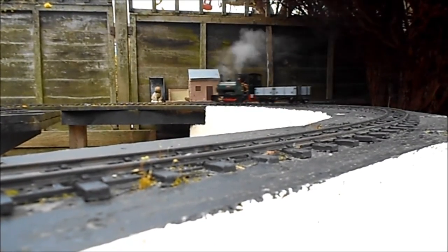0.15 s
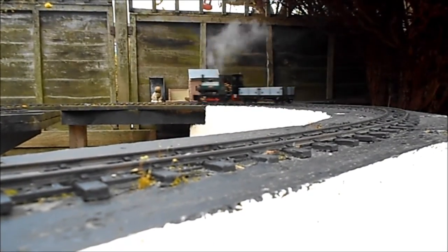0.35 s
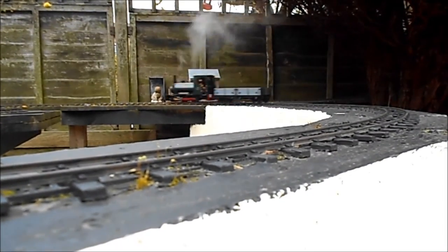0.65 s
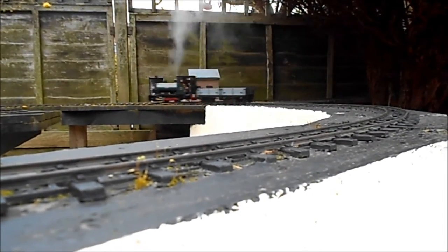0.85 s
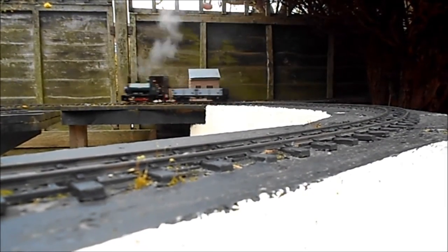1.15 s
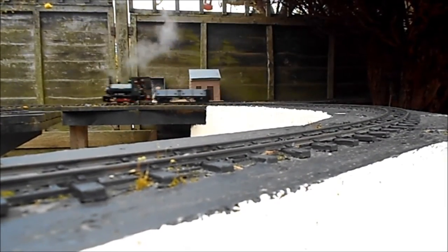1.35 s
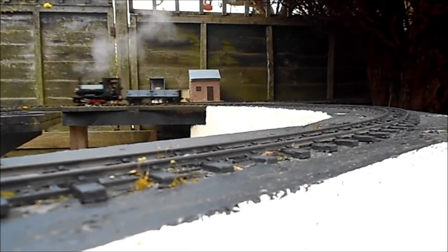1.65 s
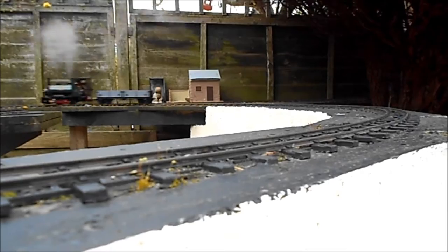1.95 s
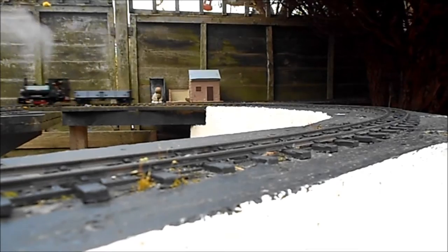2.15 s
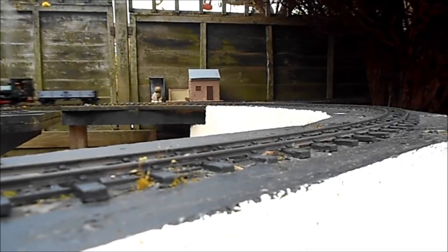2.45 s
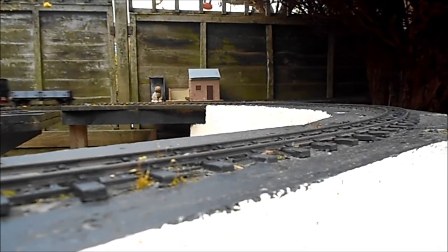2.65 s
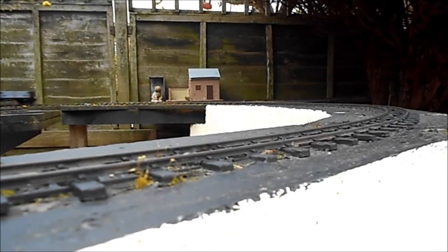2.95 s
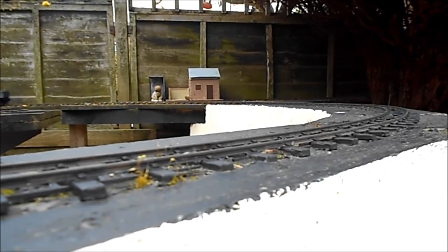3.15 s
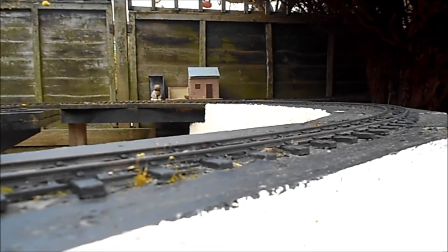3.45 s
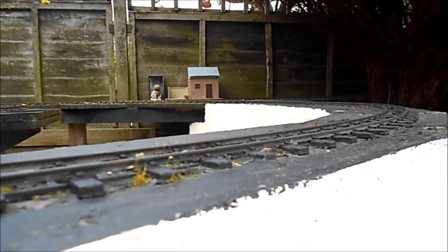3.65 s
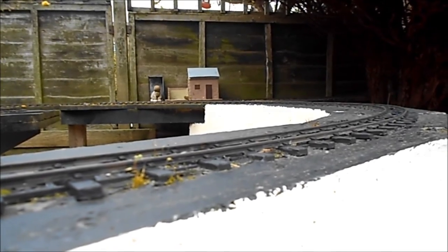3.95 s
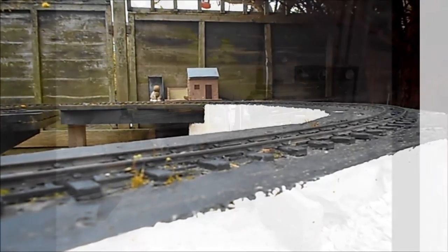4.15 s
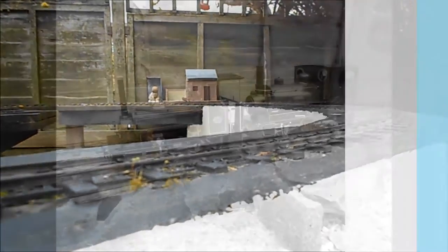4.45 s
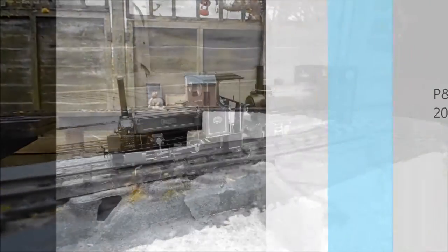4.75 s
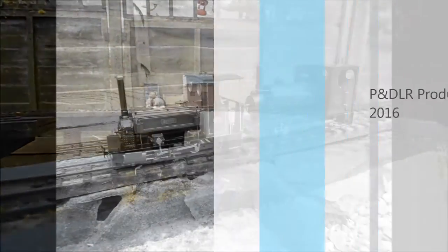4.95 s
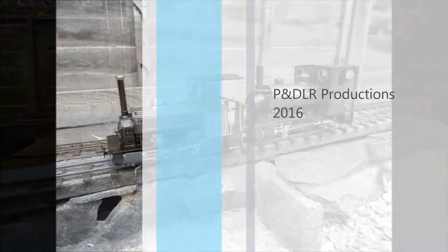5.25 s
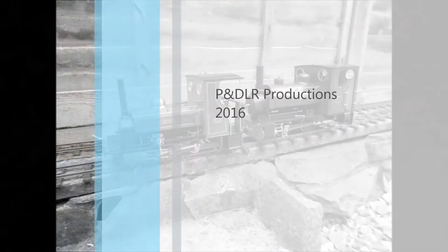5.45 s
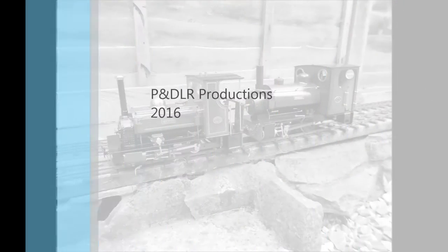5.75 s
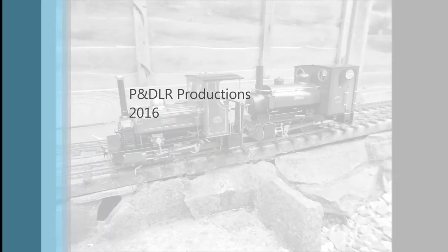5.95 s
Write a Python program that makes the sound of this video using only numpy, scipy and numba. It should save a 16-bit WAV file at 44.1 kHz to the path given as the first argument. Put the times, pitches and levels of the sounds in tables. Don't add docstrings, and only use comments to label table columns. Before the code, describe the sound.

A small steam locomotive and wagon circle a raised garden track. Broad airy hiss with a thin leaking jet runs throughout, over deck rumble and a wavering rail hum. Sharp ticks, rod chinks, coupling clinks and faint flange squeals come irregularly. Low wind thumps and fluttering bursts overload the close, unshielded microphone and briefly push the train down. Rolling grows fuller towards an abrupt cut to silence.

```python
import sys
import numpy as np
from scipy import signal
from scipy.fft import rfft, irfft
from scipy.io import wavfile
from scipy.ndimage import uniform_filter1d
from numba import njit

SR = 44100
rng = np.random.default_rng(int(sys.argv[2]) if len(sys.argv) > 2 else 0)


def ratio_of_db(decibels):
    return 10 ** (np.asarray(decibels, float) / 20)


def wav_record(signal):
    frames = np.transpose(np.atleast_2d(signal))
    bounded = np.clip(frames, -1, 1)
    quanta = np.round(bounded * 32767).astype(np.int16)
    wavfile.write(sys.argv[1], SR, quanta)


N = 269449
T = np.arange(N) / SR


def unit_rms(x):
    return x / np.sqrt(np.mean(x ** 2))


@njit
def svf(x, hz, width):
    y, b, l = np.empty(len(x)), 0., 0.
    for i in range(len(x)):
        g, k = np.tan(np.pi * hz[i] / SR), width / hz[i]
        v = (b + g * (x[i] - l)) / (1 + g * (g + k))
        b, l, y[i] = 2 * v - b, l + 2 * g * v, k * v
    return y


def walk(rate):
    k = int(SR / rate)
    held = np.repeat(rng.standard_normal(N // k + 1), k)
    x = uniform_filter1d(uniform_filter1d(held, k), k)[:N]
    return x / x.std()


def resonance(hz, width, drift, x):
    hz = hz * (1 + drift * walk(5.4))
    once = svf(x, hz, 1. * width)
    return unit_rms(svf(once, hz, 1. * width))


def patchy(spectrum, step, patchy_db, rate):
    hz, db = np.transpose(spectrum)
    octave = np.log2(np.maximum(np.fft.rfftfreq(N, 1 / SR), 1))
    whole = rfft(rng.standard_normal(N)) * ratio_of_db(np.interp(octave, np.log2(hz), db, -120, db[-1]))
    out = 0
    for centre in np.arange(np.log2(hz[0]), np.log2(hz[-1]) + .25, step):
        band = irfft(whole * np.clip(1 - abs(octave - centre) / step, 0, 1), N)
        out = out + ratio_of_db(patchy_db * walk(rate)) * band
    return unit_rms(out)


def add(out, s, grain):
    i = int(s * SR)
    out[i:i + len(grain)] += grain[:N - i]


def steam(steam_db, near):
    # (frequency [Hz], density [dB per Hz])
    hiss_spectrum = [(1200, -32.5), (1900, -6), (2120, -10), (2720, -3), (3050, -3.5), (3600, -4),
                     (4500, -1), (5200, -2), (6000, -5), (7200, -5.5), (8300, -5.5), (10300, -4)]
    hiss = ratio_of_db(0.6 * walk(40) + 3) * patchy(hiss_spectrum, 0.06, 1.4, 22)
    jet_db = -4 - 8 * near
    jet_level = ratio_of_db(jet_db - 1.5 + 1.7 * walk(16))
    jet = jet_level * resonance(9210, 2500, 0.011, rng.standard_normal(N))
    return ratio_of_db(steam_db) * (hiss + jet)


def rolling(steam_db, hum_re_steam_db, near):
    # (frequency [Hz], density [dB per Hz])
    deck_spectrum = [(59, -27.5), (100, -3.0), (188, -4.0), (304, -1.5), (346, -3), (573, -2.0),
                     (723, -5.5), (1040, -3.5), (1280, -11.5), (1860, -17.0), (2200, -27.5), (2860, -50),
                     (4840, -120)][:-2]
    # (frequency [Hz], width [Hz], level re hum [dB])
    deck_modes = [(425.7, 61, -4.5), (575, 83, -7.5)]
    deck_db = steam_db + 2.5 + 8 * near
    roar_db = steam_db - 5 + 8.5 * near + 0.21 * hum_re_steam_db
    tread = rng.standard_normal((3, N)) * ratio_of_db(0.97 * walk(90))

    deck = ratio_of_db(deck_db + 3) * patchy(deck_spectrum, .3, 1.1, 30)
    hum_hz = 1153 - 20.8 * T
    hum = resonance(hum_hz, 166, 0.033, tread[0])
    for hz, width, db in deck_modes:
        hum += ratio_of_db(db) * resonance(hz, width, 0.024, tread[0])
    hum += ratio_of_db(-15.5 + 2.4 * walk(3)) * resonance(1464, 260, 0.067, tread[2])
    roar = ratio_of_db(roar_db - 5.0) * resonance(1620, 1400, 0.04, tread[1])
    grind = ratio_of_db(deck_db - 12.0) * resonance(2970, 2400, .03, tread[2])

    span_s, span_width_s = 5.23, .09
    span_db = -27 - 6.5 * ((T - span_s) / span_width_s) ** 2
    drum = ratio_of_db(span_db) * resonance(540, 260, 0.083, tread[1])
    return drum + deck + ratio_of_db(steam_db + hum_re_steam_db - 6.0) * hum + roar + grind


def rubbed_modes(events, share, fits_db):
    out = 0
    for start, end, hz, db in events:
        rub = np.clip(np.minimum(T - start, end - T) / .02, 0, 1)
        mode = resonance(hz, share * hz, .006, rng.standard_normal(N))
        mode_rms = np.sqrt(np.average(mode ** 2, weights=rub))
        out = out + rub * ratio_of_db(db + fits_db * walk(40)) * mode / mode_rms
    return out


def flange_squeals():
    # (start [s], end [s], frequency [Hz], level [dB])
    squeal_events = [(1.03, 1.1, 9300, -43), (1.18, 1.25, 4930, -40), (1.23, 1.42, 5120, -41),
                     (1.42, 1.5, 9100, -40), (1.42, 1.5, 3200, -41), (1.51, 1.6, 3150, -46),
                     (1.43, 1.5, 5300, -40), (1.07, 1.12, 3790, -45), (.35, .41, 5210, -56),
                     (1.7, 1.75, 8420, -47), (2.0, 2.15, 3200, -43), (2.62, 2.72, 9670, -45),
                     (1.33, 1.39, 1510, -41), (1.01, 1.07, 1960, -44), (3.78, 3.85, 1765, -46),
                     (1.74, 1.92, 9250, -44), (1.79, 1.93, 3200, -43), (2.62, 2.87, 10150, -42),
                     (3.9, 4.1, 1790, -48), (4.1, 4.4, 1790, -44), (4.05, 4.5, 9950, -43),
                     (4.13, 4.28, 3000, -41), (4.21, 4.31, 3190, -40), (4.66, 4.77, 3100, -42)]
    return rubbed_modes(squeal_events, .04, 2.5)


def board_booms():
    # (start [s], end [s], frequency [Hz], level [dB])
    boom_events = [(.82, .9, 450, -36), (1.72, 1.79, 430, -36), (1.89, 1.97, 430, -34),
                   (3.97, 4.05, 925, -34), (4.15, 4.24, 905, -33), (4.62, 4.7, 1080, -33),
                   (4.83, 4.9, 300, -26), (4.92, 4.97, 330, -30), (4.95, 5.01, 620, -29),
                   (5.02, 5.09, 1000, -30), (5.09, 5.17, 950, -32), (5.15, 5.21, 420, -27),
                   (5.2, 5.28, 600, -27), (5.25, 5.31, 490, -28), (5.33, 5.41, 580, -31),
                   (5.42, 5.48, 900, -31)]
    return rubbed_modes(boom_events, 0.1, 1.5)


def taps(events, t60, width, tick):
    out, t = np.zeros(N), np.arange(SR // 8) / SR
    fade = np.exp(-np.log(1000) * t / t60)
    blow = 6 * (np.arange(len(t)) == SR // 1000)
    for s, db, hz in events:
        grit = rng.standard_normal((2, len(t))) * fade + blow
        centre = np.full(len(t), 1. * hz)
        ring = svf(svf(grit[0], centre, 1. * width), centre, 2. * width)
        ring += tick * svf(grit[1] * fade, np.full(len(t), 7000.), 8800.0)
        ring = ratio_of_db(db) * ring / abs(ring).max()
        add(out, s, ring)
        add(out, s + 0.0027, ratio_of_db(-6.5) * ring)
        add(out, s + 0.01, ratio_of_db(-10.0) * ring)
    return out


def bright_ticks():
    # (time [s], peak [dB], frequency [Hz])
    tick_events = [(.0697, -20, 5040), (.196, -34, 4910), (.3172, -31.5, 5130), (.4434, -22.5, 4750),
                   (.5117, -22, 5090), (.5716, -18.5, 7000), (.6973, -19, 5000), (.828, -14.5, 5400),
                   (.9617, -13, 4570), (1.026, -21.5, 4520), (1.2994, -16, 4600), (1.705, -22, 8430),
                   (1.799, -20, 6240), (1.8208, -17, 5140), (1.833, -18.5, 4610), (1.9629, -34.5, 4780),
                   (2.1027, -7.5, 7900), (2.1808, -12.5, 7460), (2.464, -11.5, 7500),
                   (2.5337, -10.5, 7050), (2.5457, -12, 4740), (2.6818, -17, 8490), (2.734, -16, 4730),
                   (3.0614, -37, 4500), (3.1994, -27, 8600), (4.2383, -13.5, 5070)]
    return taps(tick_events, 0.05, 2000, 1.0)


def rod_chinks():
    # (time [s], peak [dB], frequency [Hz])
    chink_events = [(.7642, -32, 9350), (1.0256, -26, 9600), (1.0645, -22, 9700), (1.4142, -26, 8820),
                    (1.5304, -25, 9200), (1.7394, -23.5, 9200), (1.7644, -25, 9150), (1.8003, -23, 9330),
                    (1.8572, -26, 8950), (1.8866, -25, 9140), (1.9629, -23, 9250), (2.4074, -27, 9100),
                    (2.7596, -20, 9520), (3.4526, -30, 9400), (3.698, -30, 9290), (3.8965, -30, 8700),
                    (4.1724, -22, 9300), (4.2393, -22.5, 9100), (4.7361, -20.5, 9400),
                    (4.7601, -14.5, 9300), (4.7945, -25, 9550), (5.2131, -26, 9670)]
    return taps(chink_events, 0.061, 900, 0.076)


def coupling_clinks():
    # (time [s], peak [dB], frequency [Hz])
    clink_events = [(.071, -30, 2910), (1.4702, -25, 3180), (1.408, -33, 2870), (1.49, -33, 2950),
                    (1.617, -34, 3030), (1.702, -26, 3870), (1.762, -30, 2900), (1.762, -30.5, 3230),
                    (1.962, -34, 3050), (1.8234, -20.5, 3180), (1.834, -26, 3040), (1.8594, -37, 3170),
                    (1.962, -27.5, 3240), (2.0552, -26.5, 3200), (2.1306, -27, 3180), (2.464, -25, 2960),
                    (2.5446, -22, 2800), (2.8235, -29, 3170), (2.8445, -32, 3430), (3.246, -39, 2960),
                    (4.151, -29, 3060), (4.1724, -30, 3030), (4.228, -25, 3200), (4.2413, -30.5, 2980),
                    (4.28, -28, 3180), (4.3665, -24.5, 3100), (4.3907, -31, 3120), (4.6734, -24.5, 3080),
                    (5.1218, -27, 3000), (5.451, -22.5, 2870)]
    return ratio_of_db(-1.5) * taps(clink_events, 0.065, 140, 0.052)


def sleeper_knocks():
    # (time [s], peak [dB], frequency [Hz])
    knock_events = [
        (4.759, -23, 1900),
        (5.391, -11, 1330),
        (5.391, -21, 1750),
    ]
    return taps(knock_events, 0.037, 300, 0)


def swell(events, column, floor_db, rise, fall):
    levels = []
    for row in events:
        start, length = row[:2]
        climb = np.maximum(rise * (start - T), 0)
        sink = np.maximum(fall * (T - start - length), 0)
        levels.append(row[column] - climb - sink)
    return np.max(levels, axis=0).clip(floor_db)


def pressure_bumps(falls, rises):
    out, hold = np.zeros(N), np.zeros(N)
    for events, sign in ((falls, -1), (rises, 1)):
        for s, db, ms in events:
            half = int(4 * ms * SR / 1000)
            u = np.arange(-half, half) / (ms * SR / 1000)
            bump = np.cos(2 * u) * np.exp(-(.35 + .12 * ms) * u ** 2)
            add(out, s - 4 * ms / 1000, sign * ratio_of_db(db - .5) * bump)
            add(hold, s - 4 * ms / 1000, .8 * np.exp(-.25 * u ** 2))
    return out, np.minimum(hold, 1)


def rounded(x):
    return 2 * np.tanh(x / 2)


def wind():
    # (time [s], length [s], buffeting [dB], eddies [dB])
    puffs = [(0.0, 0.043, -13.5, -17), (.07, 0.018, -30, -12), (.12, .02, -31, -15.5),
             (.15, 0.017, -30, -11), (.19, 0.01, -16, -20), (.28, 0.039, -16, -23), (.49, 0.017, -16, -29),
             (.58, 0.017, -22, -25), (.72, 0.017, -16.5, -38), (.84, 0.087, -22.5, -31),
             (1.13, 0.044, -10.5, -34), (1.25, 0.077, -14, -32), (1.33, 0.078, -14, -24.5),
             (1.45, 0.046, -26, -17), (1.66, 0.012, -19.5, -38), (1.8, 0.025, -23, -38),
             (2.0, 0.1, -23.5, -29), (2.14, 0.11, -14.5, -22), (2.5, 0.1, -21, -27), (2.62, 0.18, -9, -39),
             (2.8, 0.078, -11.5, -43), (2.9, 0.1, -18.5, -17), (3.14, 0.017, -22, -18),
             (3.26, 0.051, -16.5, -18), (3.38, 0.047, -22, -41), (3.6, 0.12, -23, -37),
             (4.07, 0.029, -16, -37), (4.15, 0.12, -6, -28), (4.74, 0.025, -26, -25),
             (4.86, 0.033, -25, -30)]
    # (time [s], length [s], level [dB])
    gusts = [(0.0, 0.026, -27), (.034, 0.023, -16.5), (.063, 0.016, -14), (.148, .012, -29),
             (.165, .02, -11), (.188, 0.0076, -1), (.232, 0.009, -33), (.32, 0.018, -37),
             (2.13, 0.055, -50), (2.238, .004, -28), (2.893, 0.0066, -26), (2.925, 0.015, -19),
             (2.95, 0.03, -18), (3.0, .02, -26), (3.03, 0.031, -22), (3.08, 0.017, -17), (3.12, 0.037, -24),
             (3.195, .006, -27), (3.272, .012, -12), (3.375, 0.011, -15.5)]
    # (time [s], peak [dB], width
    # [ms])
    sucks = [(.0365, -7, 1.1), (.0829, -8, 1.3), (.1712, -4, .7), (.1765, -9, .45), (.1797, -2, 1.5),
             (.1909, 4, .65), (1.1458, -8, 4.7), (1.1773, -9, 5), (1.3357, -11, 5), (1.3649, -10, 5.4),
             (1.445, -11, 9), (1.4805, -14, 4), (1.5044, -5, 5.5), (2.1477, -9, 2.5), (2.183, -12, 8),
             (2.2063, -10, 1.7), (2.2389, -8, 1.2), (2.7587, -10, 2.1), (2.8932, -2, 1.6), (2.8958, -3, .6),
             (2.9284, -4, 1.1), (3.0158, -9, 4), (3.1001, -10, 2.2), (3.1064, -10, 1), (3.155, -10, 4.5),
             (3.2825, -12, .9), (3.2858, -16, .9), (.0415, -13, 1.3), (.0475, -14, 1.2), (.0625, -10, 1.5),
             (.0758, -12, 2.5), (.1205, -15, 3), (.149, -12, 4), (.1662, -18, .8), (.188, -11, 1),
             (.2015, -12, 4), (1.667, -13, 4), (2.9125, -10, 4), (2.9425, -15, 3), (2.9555, -15, 1.3),
             (2.983, -13, 3), (3.062, -13, 1.5), (3.074, -17, 5), (3.267, -17, 3), (3.312, -21, 8),
             (3.384, -18, 2.5), (3.5615, -14, 5), (3.624, -17, 9), (3.674, -20, 7), (5.4831, -11, .7),
             (.1693, -11, .8), (2.9722, -16, .8), (2.9758, -15, .9), (3.0585, -17, .6), (3.2758, -15, .7),
             (4.0846, -12, 5), (4.1684, -8, 3.2), (4.2027, -11, 2.8), (4.2511, -11, 2.8)]
    # (time [s], peak [dB], width [ms])
    pushes = [(.0318, -8, 1), (.064, -6, .9), (.1535, -11, .8), (.1553, -13, .9), (.1617, -8, .9),
              (.1722, -6, .9), (.183, -6, .7), (.5959, -13, 6.6), (1.3441, -14, 3), (1.4628, -11, 6),
              (2.1572, -10, 4), (2.1697, -7, 4), (2.1945, -7, 1.4), (2.5391, -11, .7), (2.7671, -15, 3),
              (3.0363, -8, 1.2), (3.0511, -9, 1.6), (3.0605, -12, .7), (3.0819, -7, 1.1),
              (3.1213, -11, 1.3), (3.2519, -13, 1.8), (3.2745, -7, 1.5), (3.2799, -12, 2),
              (3.2838, -15, 1.2), (.0505, -13, 2.5), (.0665, -11, .8), (.079, -12, 2), (.0862, -11, 2.5),
              (.145, -11, 2.5), (.1935, -8, 1.1), (.1759, -13, .55), (.1774, -12, .5), (.1785, -13, .45),
              (.1868, -10, .8), (.0354, -13, .6), (.158, -13, .8), (3.103, -15, 1.2), (3.1102, -15, 1),
              (.209, -12, 4), (2.8969, -9, .9), (2.9302, -10, 1.5), (2.95, -16, 2.1), (2.9669, -13, 1.1),
              (2.9736, -13, 1), (2.979, -11, .9), (2.9886, -11, 1.5), (3.0209, -15, 1.2),
              (3.0928, -15, 1.7), (3.1406, -14, 3.5), (3.1986, -18, 1), (3.2905, -17, 3.4),
              (3.3767, -18, 1.4), (3.4359, -18, 3.5), (3.597, -21, 4), (3.61, -14, 3), (3.3866, -12, 1.4),
              (4.1493, -16, 3), (4.1892, -11, 2.3)]
    # (time [s], peak [dB], width [ms])
    sags = [(.0233, -14, 3.5), (.0098, -15, 2.4), (.1603, -16, 1), (.1641, -15, 1.1), (.1924, -13, .5),
            (3.2775, -17, .55), (3.396, -20, 4), (.2609, -16, 5.3), (.3144, -18, 11), (.4713, -19, 8),
            (.73, -17, 10), (.8453, -17, 9), (.9092, -17, 10), (1.2591, -16, 10), (1.3972, -15, 12),
            (2.0249, -17, 12), (2.2301, -17, 10), (2.2646, -18, 12), (2.5316, -16, 5.4), (2.6334, -19, 13),
            (2.6663, -17, 6), (2.7464, -12, 7), (2.7744, -15, 7), (2.7875, -17, 7), (2.8381, -9, 5),
            (2.874, -14, 10), (3.9911, -19, 13), (4.1439, -16, 11), (4.232, -15, 14), (4.2917, -19, 12),
            (4.854, -12, 1.2), (5.1825, -10, 1.2)]
    # (time [s], peak [dB], width [ms])
    heaves = [(.0274, -11, 1.8), (.0161, -17, 1.2), (3.748, -17, 18), (.3285, -18, 9), (.4974, -18, 6.6),
              (1.1339, -15, 8), (1.163, -13, 16), (1.2656, -18, 12), (1.3209, -16, 13), (1.3768, -14, 9),
              (1.4085, -15, 5), (1.4178, -13, 8), (1.5296, -17, 20), (2.0091, -18, 7), (2.0395, -19, 14),
              (2.0985, -17, 8), (2.2152, -18, 12), (2.2455, -19, 13), (2.5152, -15, 7), (2.6096, -14, 11),
              (2.6491, -17, 5), (2.706, -16, 16), (2.799, -12, 14), (2.8122, -14, 5.3), (2.8451, -12, 10),
              (2.8632, -10, 7.4), (2.8866, -10, 11), (3.9759, -19, 10), (4.0913, -16, 7), (4.1146, -17, 14),
              (4.2152, -16, 15), (4.2694, -18, 11)]
    low_db = swell(puffs, 2, -28, 347, 205.5)
    eddy_db = swell(puffs, 3, -35, 347, 205.5)
    flutter_db = swell(gusts, 2, -80, 1301.5, 1101)

    noise = rng.standard_normal((3, N))
    swings = ratio_of_db(low_db) * rounded(resonance(25, 62.7, 0.19, noise[0] * ratio_of_db(1.0 * walk(18))))
    eddies = ratio_of_db(eddy_db - 3.5) * rounded(resonance(140, 170, .12, noise[1] * ratio_of_db(1.5 * walk(45))))
    flutter = resonance(440, 820, 0.4, noise[2] * ratio_of_db(2.0 * walk(70)))
    flutter = resonance(390, 740, 0.13, flutter)
    spray_db = -10.5 + 0.1 * flutter_db
    flutter = flutter + ratio_of_db(spray_db) * resonance(752.5, 570, 0.089, noise[2])

    slap, hold = pressure_bumps(sucks, pushes)
    heave, still = pressure_bumps(sags, heaves)
    turbulence = (1 - still) * swings + eddies + ratio_of_db(flutter_db - 6.5) * flutter
    return slap + heave + (1 - hold) * turbulence


def ducking():
    # (time [s], depth [dB], wait [s])
    dips = [
        (-.03, 7.5, 0.23),
        (0.204, 13, 0.12),
        (1.509, 7, 0.091),
        (2.24, 3.5, 0.14),
        (2.907, 10.5, 0.29),
        (3.1, 12, .4),
    ]
    attack_s, climb_db_per_s = 0.047, 17.5
    depths = []
    for s, db, wait in dips:
        onset = np.clip((T - s) / attack_s + .5, 0, 1)
        depths.append(onset * np.clip(db - climb_db_per_s * (T - s - wait), 0, db))
    return -np.max(depths, axis=0)


def scene():
    # (time [s], steam [dB], nearness [0-1], rail hum re steam [dB])
    passage = [(0.0, -32.5, 0.13, 4), (.5, -33.5, 0.1, 7), (.8, -34.5, 0.2, 9.5), (.86, -33.5, 0, 11.5),
               (1.1, -35, 0.34, 11), (1.4, -34, 0.29, 7.5), (2.0, -33.5, 0.07, 10), (2.55, -33, 0.53, 6),
               (2.9, -34, 0.22, 6), (3.6, -34, 0.52, 6), (3.95, -32, 0.45, -10), (4.25, -35.5, 0.64, 0.5),
               (4.6, -34, 0.62, 9), (4.9, -32.5, 0.79, -1), (5.15, -33, 1, -11.5), (5.48, -32.5, 0.92, 6)]
    s, *columns = np.transpose(passage)
    steam_db, near, hum_re_steam_db = [np.interp(T, s, column) for column in columns]
    steam_db = steam_db + ducking()
    train = steam(steam_db, near) + rolling(steam_db, hum_re_steam_db, near)
    train += flange_squeals() + board_booms()
    train += bright_ticks() + rod_chinks() + coupling_clinks() + sleeper_knocks()
    return (train + wind())[None]


def band_limit(x):
    return signal.sosfilt(signal.butter(12, 15700, fs=SR, output="sos"), x)


def record(dry):
    # (frequency [Hz], gain [dB])
    treble = [(10200, 0), (10600, -8), (11000, -24), (11060, -33), (11370, -44), (11500, -70)]
    end_s = 5.484
    top_db = np.interp(np.fft.rfftfreq(N, 1 / SR), *np.transpose(treble))
    x = irfft(rfft(np.clip(dry, -.89, .89)) * ratio_of_db(top_db), N) + .002
    return band_limit(x * (np.arange(N) < end_s * SR))


dry = scene()
out = record(dry)
wav_record(out)
```